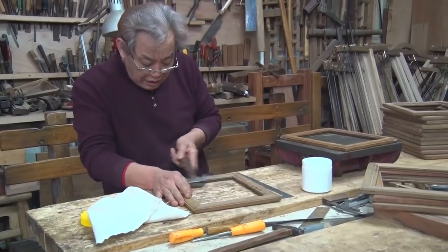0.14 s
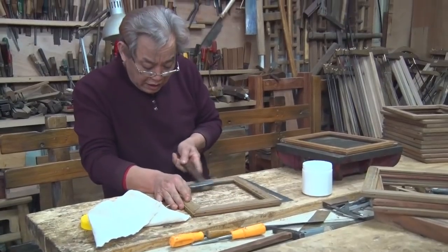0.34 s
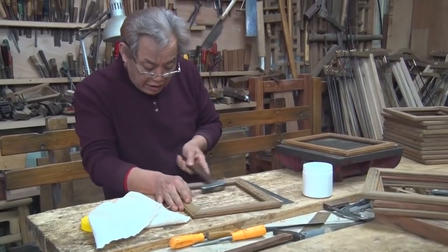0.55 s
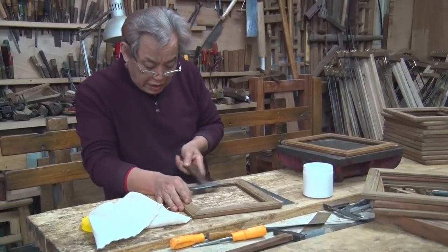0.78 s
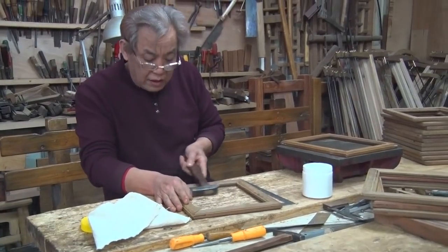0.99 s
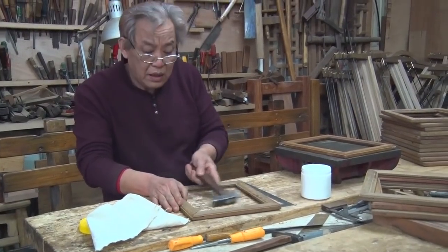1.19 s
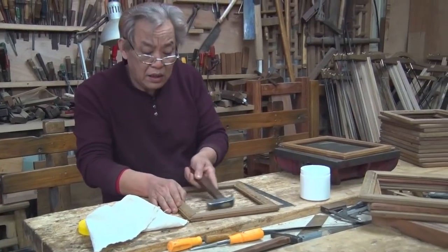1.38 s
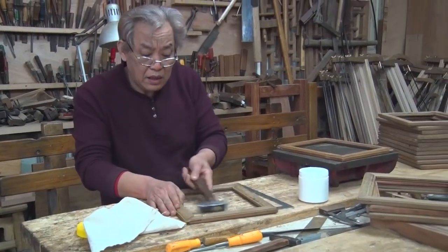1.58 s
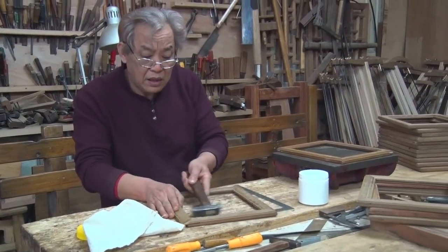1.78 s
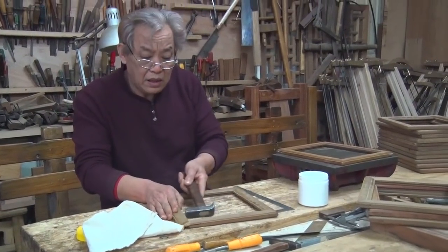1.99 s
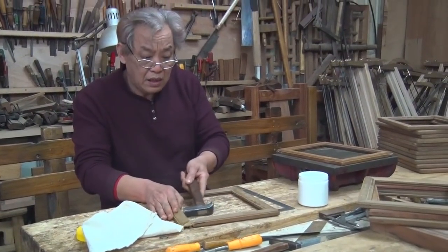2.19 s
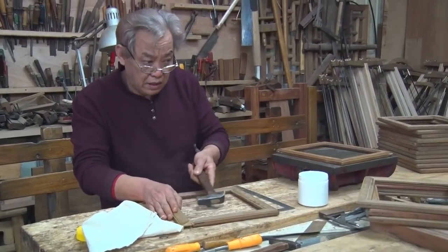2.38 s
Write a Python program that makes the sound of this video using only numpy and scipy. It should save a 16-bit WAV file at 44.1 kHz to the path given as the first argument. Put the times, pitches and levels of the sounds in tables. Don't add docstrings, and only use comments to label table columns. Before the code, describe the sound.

A small hammer taps a wooden frame corner in quick, regular strokes on a workshop bench

```python
import sys
import numpy as np
from scipy import signal
from scipy.fft import rfft, irfft
from scipy.io import wavfile
from scipy.ndimage import uniform_filter1d

SR = 44100
rng = np.random.default_rng(int(sys.argv[2]) if len(sys.argv) > 2 else 0)


def field_ratio(decibels):
    return 10 ** (np.asarray(decibels, dtype=float) / 20)


def to_wav(sig):
    pcm = np.clip(np.atleast_2d(sig), -1, 1) * 32767
    pcm = np.round(pcm).astype(np.int16)
    wavfile.write(sys.argv[1], SR, pcm.T)


N = 108045
LEAD = 2048

# freq_hz [Hz], level_db [dB], t60_s [s]
BENCH_MODES = [(112, -17, 0.046), (160, -6, 0.094), (216, -2, 0.098), (260.4, 6, 0.04), (321, -8.5, 0.058),
               (400.7, -1, 0.065), (433, 6.5, 0.021), (618, -11.5, 0.042), (702, 7, 0.036),
               (867, -8, 0.017), (1130, 7.5, 0.0051)]


def evened(x):
    return x / np.sqrt(np.mean(x ** 2) + 1e-20)


def read(points, hz):
    f, value = np.transpose(points)
    return np.interp(np.log(hz + 1), np.log(f + 1), value)


def colour(x, points):
    n = x.shape[-1]
    gain_db = read(points, np.fft.rfftfreq(n, 1 / SR))
    return irfft(rfft(x) * field_ratio(gain_db), n)


def flattened(x, size):
    z = rfft(x)
    power = uniform_filter1d(abs(z) ** 2, size=size)
    return irfft(z / np.sqrt(power + 1e-12), len(x))


def highpass(x, order, cut_hz):
    return signal.sosfilt(signal.butter(order, cut_hz, "high", fs=SR, output="sos"), x)


def ring(hz, db, t60_s, t):
    decay = field_ratio(db[:, None] - 60 * t / t60_s[:, None])
    return (decay * np.sin(2 * np.pi * hz[:, None] * t)).sum(0)


def add(mix, start_s, sound):
    part = mix[round(start_s * SR) + LEAD:][:len(sound)]
    part += sound[:len(part)]


def tap(force_db, low_db, tilt_db, ring_hz, ring_db, upper_hz, upper_db):
    # freq_hz [Hz], level_db [dB], t60_s [s]
    frame_modes = [(707, 1, 0.0094), (1000, -23, 0.0083), (1480, -13, 0.024), (1840, 3.5, 0.0095),
                   (2207, -3.5, 0.011), (2619, 0.5, 0.0056), (3257, -2.5, 0.0064), (3700, -2.5, 0.0045),
                   (4197, -7, 0.0031), (5320, 5, 0.0017), (6260, -12.5, 0.011), (7030, -16, 0.001),
                   (8170, -5, 0.0019), (10700, -15.5, 0.0063)]
    chatter_s, contacts_per_s = 0.0047, 5000
    ring_t60_s, upper_t60_s = 0.028, 0.011
    t = np.arange(4096) / SR

    hz, db, t60_s = np.transpose(frame_modes)
    level_chance, pitch_chance = rng.standard_normal((2, len(hz)))
    db = db + tilt_db * np.log2(hz / 2000) + low_db * (hz < 1200) + 2.07 * level_chance
    hz = hz * (1 + 0.023 * pitch_chance)
    body = ring(np.append(hz, [ring_hz, upper_hz]), np.append(db, [ring_db, upper_db]),
                np.append(t60_s, [ring_t60_s, upper_t60_s]), t)
    body = highpass(body, 3, 557)

    u = t / chatter_s
    shape = np.minimum(u * 8, 1) * np.exp(-u ** 2)
    contacts = rng.standard_normal(4096) * (rng.random(4096) < contacts_per_s / SR)
    hits = flattened(contacts * shape, size=15) * np.exp(-(u / 2) ** 4)
    return field_ratio(force_db - 15) * evened(signal.fftconvolve(hits, body)[:4096])


def hammering():
    # start_s [s], force_db [dB], low_wood_db [dB], tilt_db [dB per octave], ring_hz [Hz]
    tap_events = [
        (.209, -9, -9.5, 0.5, 1000),
        (0.4318, -10.5, -14.5, 1.5, 1004),
        (0.6609, -8, -1, 2.5, 1480),
        (0.877, -11.5, -2.5, 1, 2066),
        (1.298, -10.5, 10, 2.5, 1757),
        (1.5225, -11, 4, 2.5, 1674),
        (1.746, -12, 7, 5.5, 1640),
        (1.967, -12, -8.5, 5, 1840),
        (2.153, -17, -11, -1.5, 1390),
    ]
    # force_db [dB], low_wood_db [dB], tilt_db [dB per octave], ring_hz [Hz]
    earlier_tap = (-17.5, -7.5, 0, 1297)
    # ring_db [dB], upper_hz [Hz], upper_db [dB]
    joint_spots = [(-9, 3800, -10), (-10.5, 1600, -3), (-8, 2400, -9.5), (-13, 2600, -7.5), (-9, 2670, -8),
                   (6.5, 3000, -18.5), (0, 3360, -19), (-6.5, 4110, 2.5), (-10.5, 2600, 2.5),
                   (-6.5, 2850, -7.5)]
    track = np.zeros(N + LEAD)
    for (start_s, *strike), spot in zip([(-.013, *earlier_tap), *tap_events], joint_spots):
        add(track, start_s, tap(*strike, *spot))
    return track


def rumble():
    bumps_per_s, end_s, level_db = 200, 2.14, -46.5
    n = N + LEAD
    bumps = (rng.random(n) < bumps_per_s / SR) * rng.standard_normal(n) * field_ratio(3 * rng.exponential(1, n))
    hz, db, t60_s = np.transpose(BENCH_MODES)
    body = ring(hz, db - 6 * np.log2(hz / 200), t60_s, np.arange(8192) / SR)
    late_s = np.maximum((np.arange(n) - LEAD) / SR - end_s, 0)
    busy = field_ratio(-80 * late_s)
    return field_ratio(level_db) * evened(signal.fftconvolve(bumps * busy, body)[:n])


def knock(force_db, hard_hz, near_hz):
    push_s, rise_s, nearest_db = 0.01, 0.0013, 6
    t = np.arange(8192) / SR
    hz, db, t60_s = np.transpose(BENCH_MODES)
    softness_db = 10 * np.log10(1 + (hz / hard_hz) ** 3)
    nearness = np.exp(-(np.log2(hz / near_hz) / 0.13) ** 2)
    body = ring(hz, db - softness_db + nearest_db * nearness, t60_s, t)

    fade = np.exp(-t[:2048] / push_s)
    push = flattened(rng.standard_normal(2048) * fade, size=3)
    push = evened(push * np.sqrt(fade) * (1 - np.exp(-t[:2048] / rise_s))) / 4

    sound = evened(signal.fftconvolve(push, body)[:8192]) / 2.41
    grit_db = -11 + 57 * np.log10(hard_hz / 1500)
    sound[:2048] += field_ratio(grit_db) * signal.lfilter([1], [1, -.85], push)
    return field_ratio(force_db - 6) * sound


def rocking():
    # start_s [s], force_db [dB], hardness_hz [Hz], near_mode_hz [Hz] (bench mode nearest the contact)
    knock_events = [(.005, -35.5, 505, 204), (.04, -38, 500, 201), (0.111, -41.5, 500, 171),
                    (0.18, -24, 923, 230), (.225, -29.5, 500, 203), (0.244, -30.5, 490, 258),
                    (.40, -41.5, 400, 201), (0.443, -29, 404, 250), (0.573, -42, 400, 176),
                    (.633, -34.5, 774, 203), (.675, -31, 500, 430), (0.713, -28.5, 491, 252),
                    (0.842, -35, 407, 170), (0.941, -33, 400, 247), (1.042, -42, 500, 216),
                    (1.135, -29, 800, 192), (1.154, -32, 590, 198), (1.242, -19, 1570, 176),
                    (1.266, -22, 505, 186), (1.303, -27.5, 800, 160), (1.359, -40.5, 400, 172),
                    (1.408, -32.5, 500, 198), (1.457, -30, 1100, 700), (1.542, -29.5, 600, 190),
                    (1.622, -35, 400, 160), (1.669, -35.5, 594, 193), (1.761, -31.5, 500, 248),
                    (1.87, -36.5, 487, 193), (2.175, -30, 490, 261), (2.259, -38.5, 394, 150)]
    track = rumble()
    for start_s, *contact in knock_events:
        add(track, start_s, knock(*contact))
    return track


def tail():
    # freq_hz [Hz], t60_s [s]
    shop_t60 = [(150, .4), (500, 0.6), (1500, 0.44), (3000, 0.41), (6000, 0.35), (11000, 0.24)]
    # freq_hz [Hz], level_db [dB]
    shop_tone = [(150, 10.5), (600, -4), (1500, -2), (4000, 0.5), (6500, -6.5), (8000, -11), (11000, -8)]
    near_db, near_share, rise_s = 7.5, 0.47, 0.0013
    hz, t, z = signal.stft(rng.standard_normal(SR), SR, nperseg=256)
    t60_s = read(shop_t60, hz)[:, None]
    far = field_ratio(-60 * t / t60_s)
    near = field_ratio(near_db - 60 * t / (near_share * t60_s))
    x = signal.istft(z * np.hypot(far, near), SR, nperseg=256)[1][:SR]
    x = x * (1 - np.exp(-np.arange(SR) / SR / rise_s))
    x = colour(flattened(x, size=120), shop_tone) * (np.arange(SR) < SR - 4096)
    return x / np.linalg.norm(x)


def shop(x, wet_db, direct):
    # delay_s [s], level_db [dB]
    close_echoes = [
        (.0088, -11),
        (0.0175, -7),
        (0.02, -13),
        (0.031, -25),
    ]
    path = np.zeros(SR)
    for delay_s, level_db in close_echoes:
        path[round(delay_s * SR)] += field_ratio(level_db + wet_db + 5) * rng.choice([-1., 1.])
    path = signal.sosfilt(signal.butter(2, 4200, fs=SR, output="sos"), path)
    path = path + field_ratio(wet_db) * tail()[:SR]
    path[0] += direct
    return signal.fftconvolve(x, path)[LEAD:LEAD + N]


def shop_hush():
    # freq_hz [Hz], density_db [dB per Hz]
    hush_tone = [(15, -52), (25, -42), (173, 26), (884, -44.5), (1300, -30.5), (1670, -37.5), (2710, 4.5),
                 (11000, -6.5), (14300, -82.5), (22000, -120)]
    return field_ratio(-51.5 - 15) * evened(colour(rng.standard_normal(N), hush_tone))


def patchy(x):
    z = signal.stft(x, nperseg=2048, noverlap=1024)[2]
    open_frames = rng.random(z.shape[1]) < .3
    bands = rng.random((z.shape[0] // 16 + 1, z.shape[1]))
    bands = np.repeat(bands, 16, axis=0)[:z.shape[0]]
    passed = bands < np.where(open_frames, .8, .1)
    return signal.istft(z * passed, nperseg=2048, noverlap=1024)[1][:N]


def side_signal(work):
    # freq_hz [Hz], level_db [dB]
    side_tone = [(60, -12), (170, -50.5), (490, -32), (1410, -35.5), (4030, -27.5), (11600, -16.5)]
    room = field_ratio(4.5) * colour(shop(work, -2, .5), side_tone)
    hiss = field_ratio(-98.5) * rng.standard_normal(N)
    return patchy(room + hiss)


def scene():
    taps, knocks = hammering(), rocking()
    mid = shop(taps, -5, 1) + shop(knocks, -10.5, 1) + shop_hush()
    side = side_signal(taps + knocks)
    return np.array([mid + side, mid - side])


def top_cut(x):
    return signal.sosfilt(signal.butter(12, 12150, fs=SR, output="sos"), x)


def record(dry):
    x = np.tanh(highpass(dry, 4, 150))
    noise_tone = [(20, -1), (90, -2.0), (200, -33), (9000, -68)]  # (Hz, dB)
    x = x + field_ratio(-84.5) * evened(colour(rng.standard_normal(x.shape), noise_tone))
    band_limit = signal.firwin(71, 10940, window=("kaiser", 7), fs=SR)
    x = signal.oaconvolve(x, band_limit[None], "same")
    return top_cut(x)


dry = scene()
out = record(dry)
to_wav(out)
```